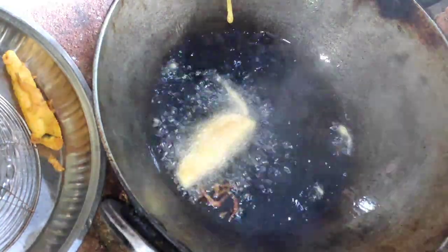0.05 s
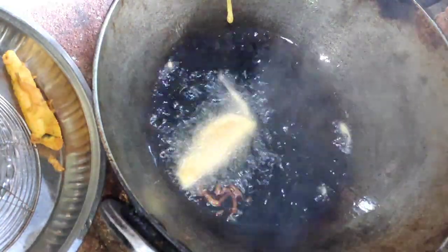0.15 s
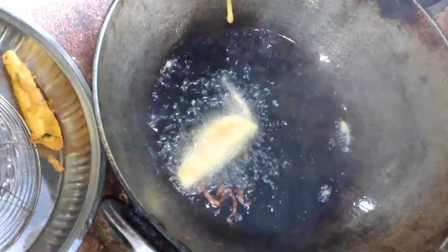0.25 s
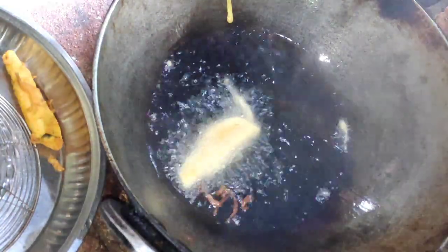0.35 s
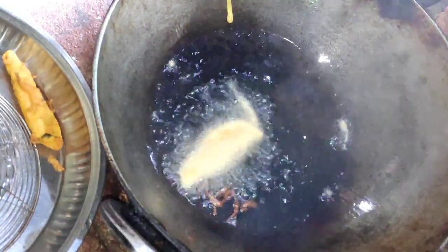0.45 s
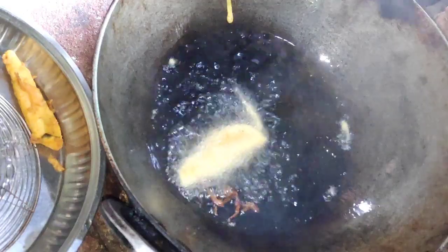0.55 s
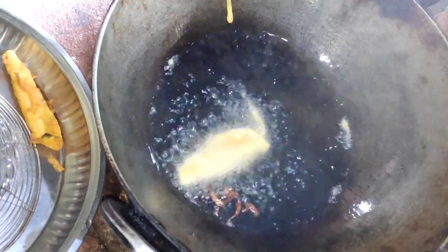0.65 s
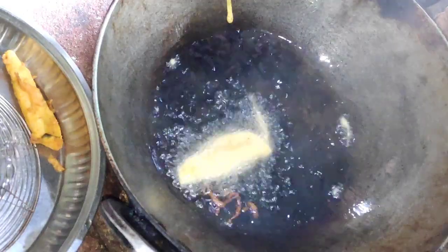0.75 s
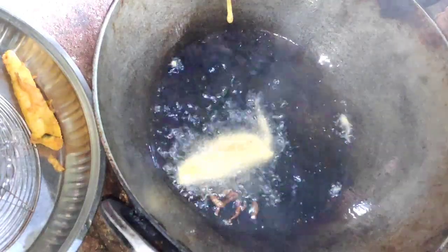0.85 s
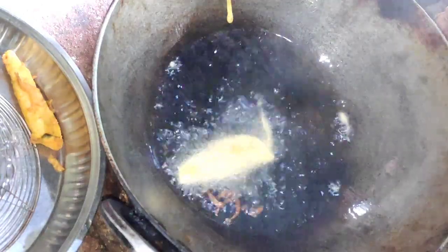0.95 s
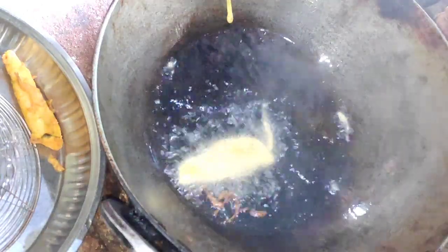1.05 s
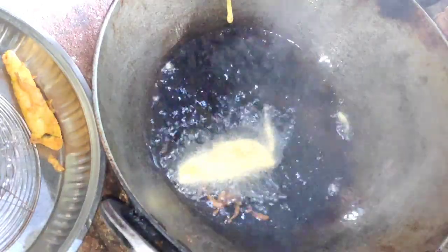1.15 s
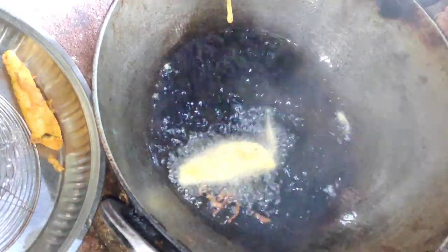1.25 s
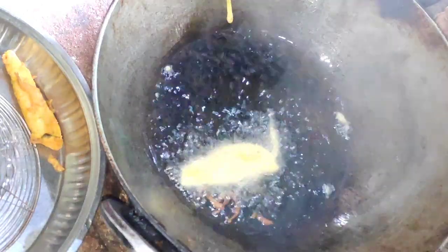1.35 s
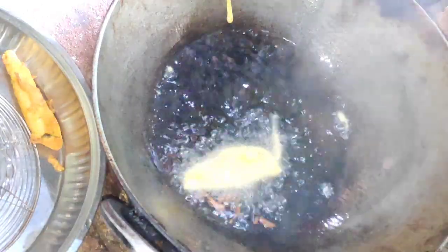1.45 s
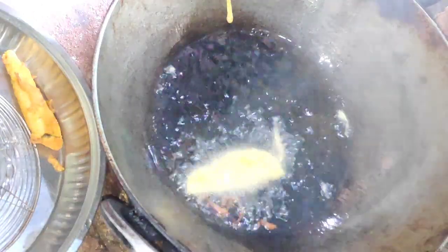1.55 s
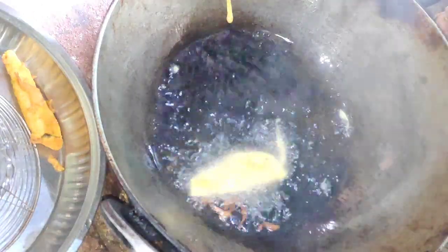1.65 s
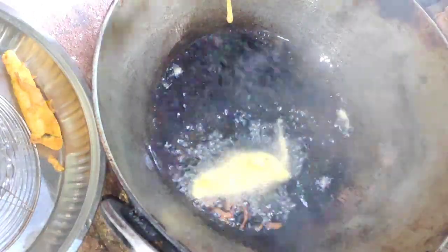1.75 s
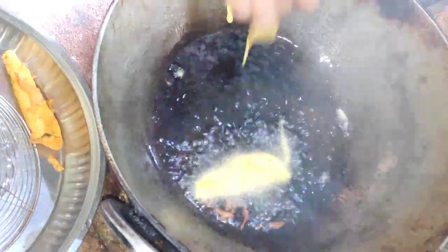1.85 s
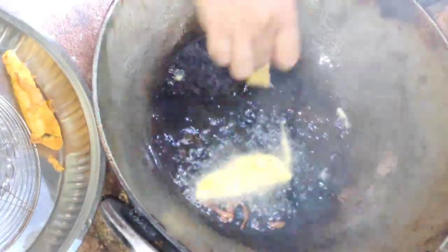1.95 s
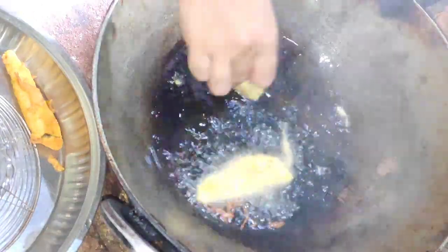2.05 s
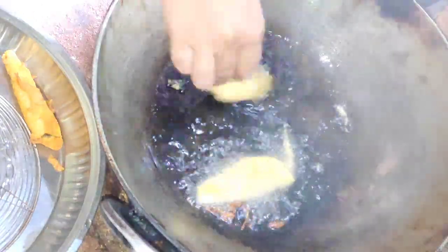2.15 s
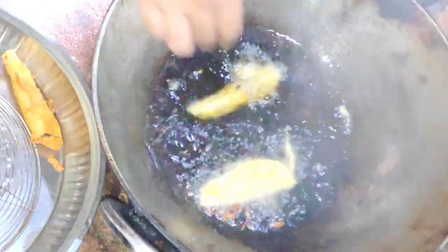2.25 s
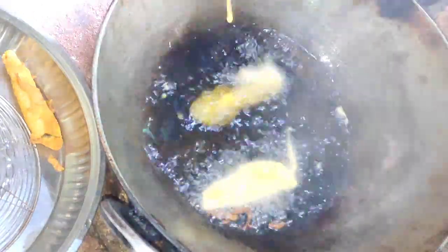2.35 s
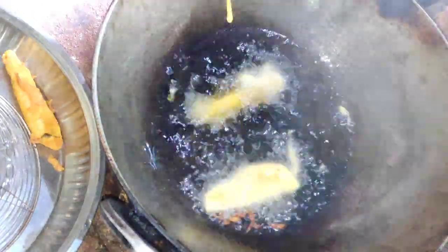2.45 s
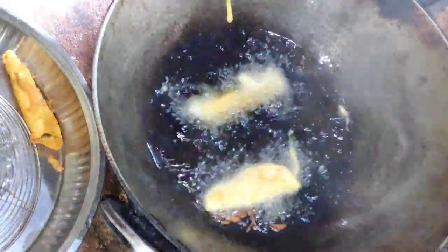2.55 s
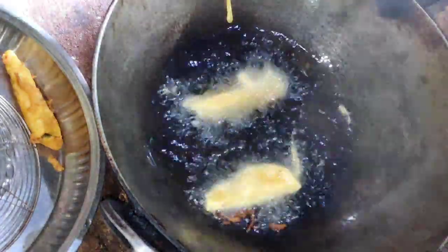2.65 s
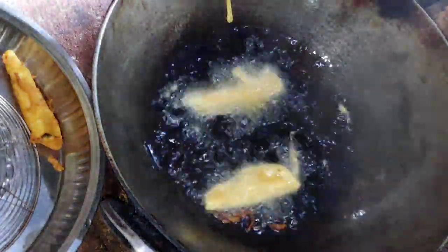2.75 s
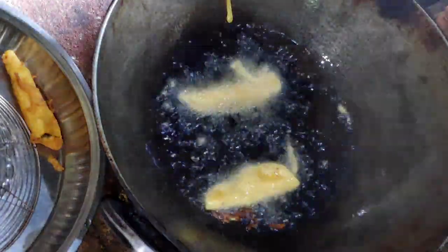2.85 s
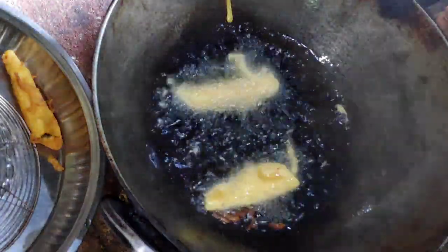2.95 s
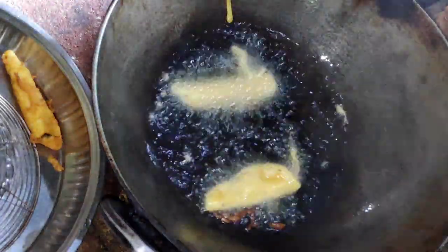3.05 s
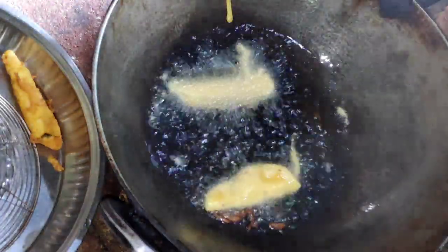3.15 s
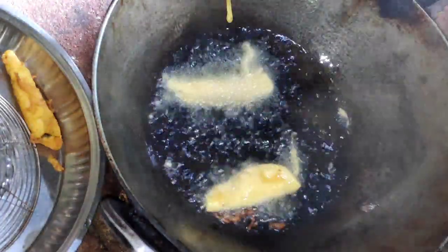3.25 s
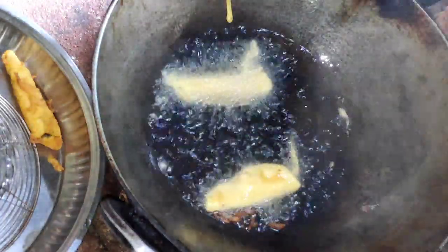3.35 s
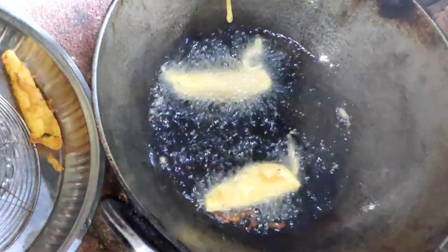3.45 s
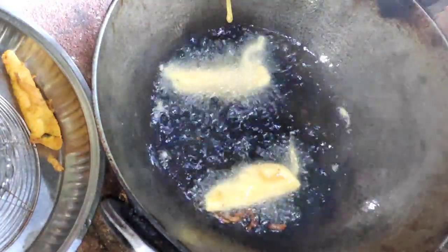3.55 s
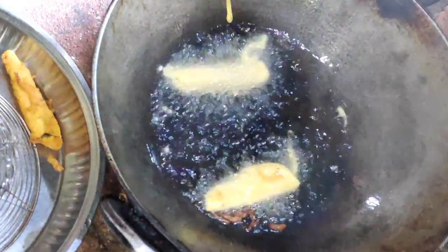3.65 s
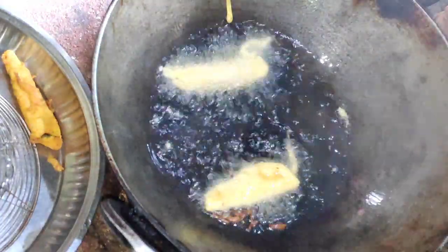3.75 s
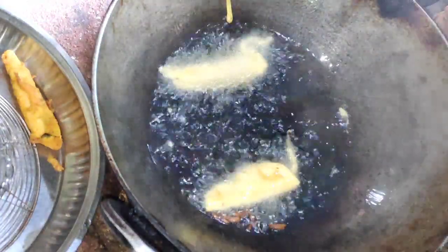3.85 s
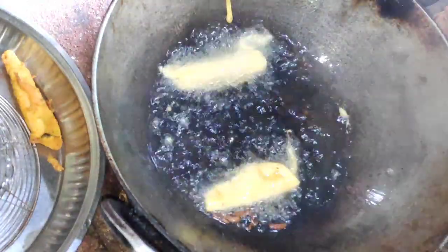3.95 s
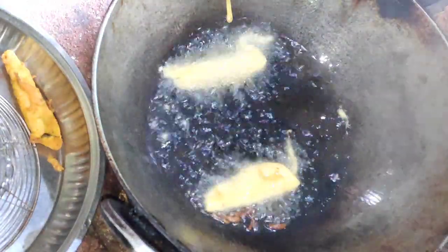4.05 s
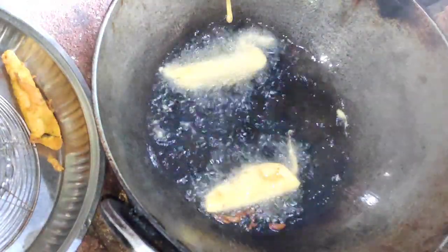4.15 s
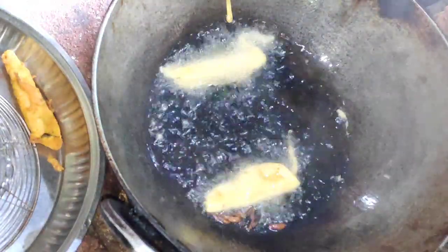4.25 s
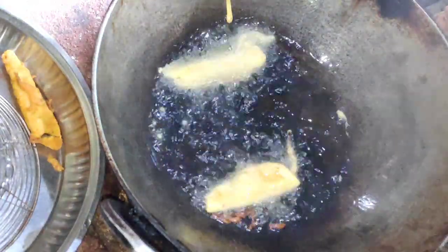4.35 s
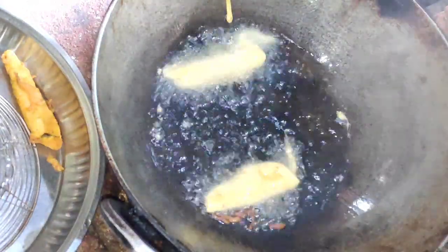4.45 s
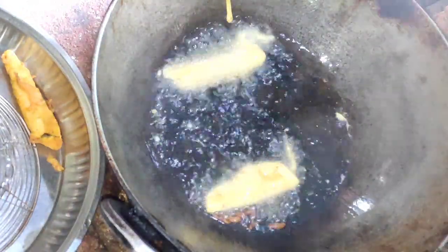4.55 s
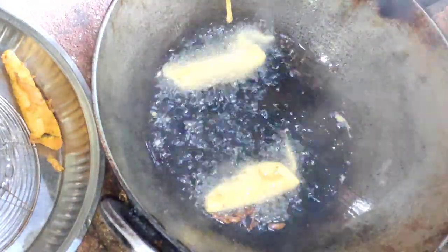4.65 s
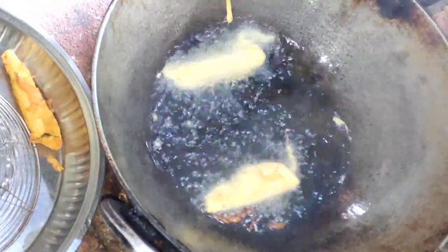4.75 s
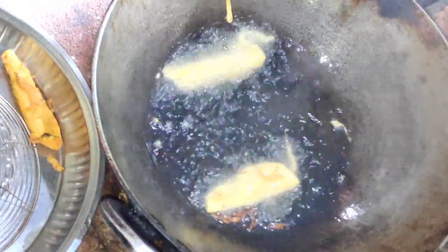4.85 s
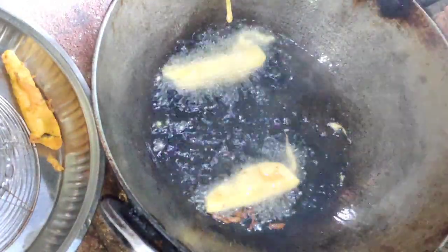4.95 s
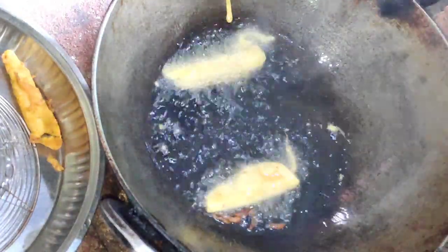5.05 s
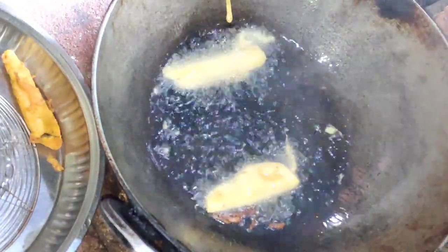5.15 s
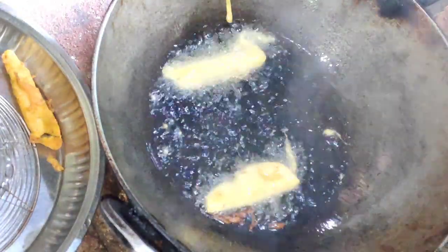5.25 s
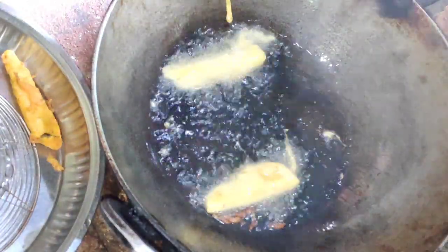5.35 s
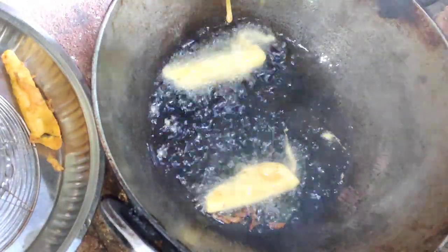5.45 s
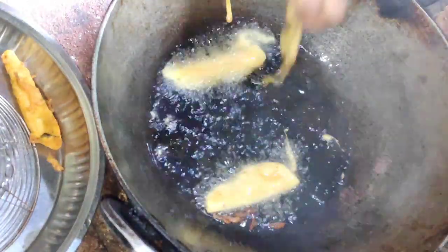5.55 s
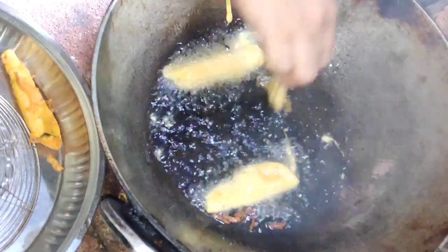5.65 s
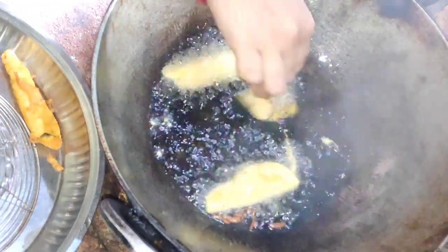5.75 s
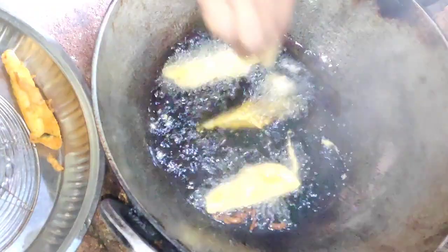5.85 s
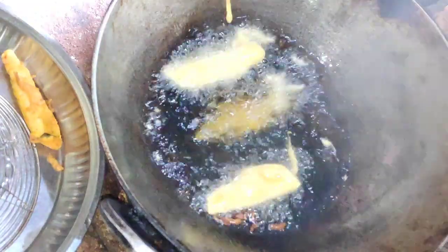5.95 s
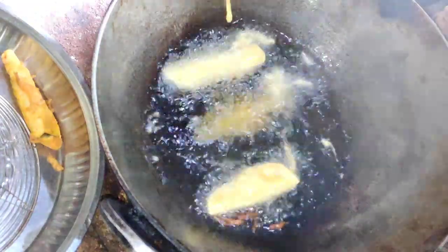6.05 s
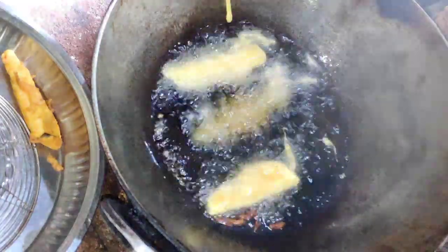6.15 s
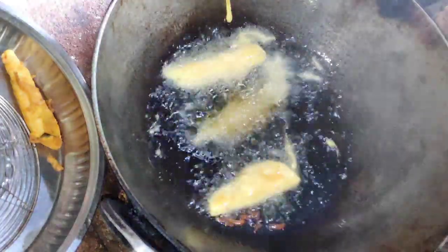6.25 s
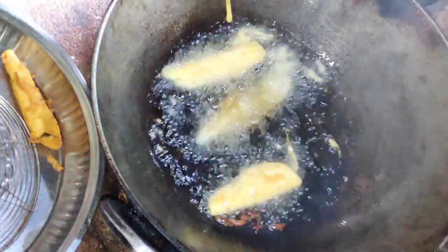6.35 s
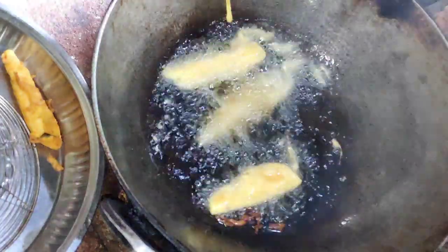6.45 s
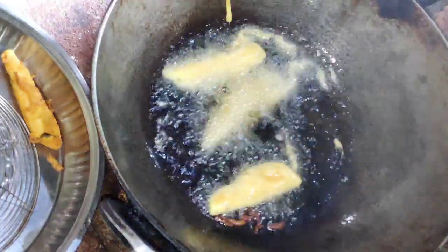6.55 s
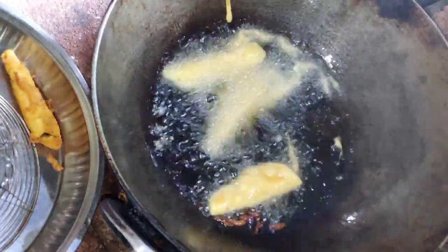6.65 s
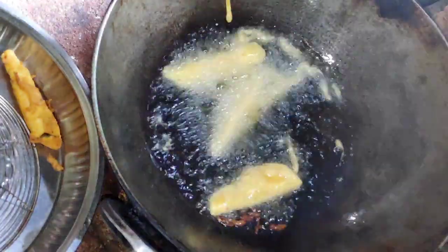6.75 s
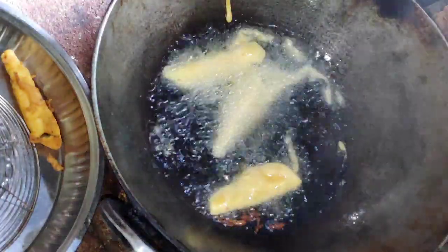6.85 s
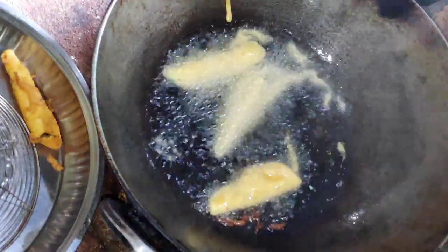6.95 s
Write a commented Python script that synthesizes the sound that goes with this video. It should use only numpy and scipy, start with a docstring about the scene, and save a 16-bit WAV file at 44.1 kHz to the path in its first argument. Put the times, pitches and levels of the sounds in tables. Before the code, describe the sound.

Deep frying in a wok of oil, heard close in stereo in a small kitchen, with brighter treble on the left. At 0 s a bright, airy sizzle lies over duller, patchy froth, with tiny droplet ticks and faint rings; it calms over two seconds. A tight, loud cluster of spits cracks at 0.7 s, with smaller ones until 2 s and faint deep rumbling from 0.5 to 2 s. Around 2.1 to 2.4 s a piece enters: the frying flares with crisp pops and dull gulps, then slowly eases. Isolated snaps come at 3.75, 3.9 and 4.5 s. From 5.1 to 5.75 s spits thicken into a rapid, sharp crackling flurry. Another piece enters near 5.7 to 5.9 s, and the sizzle and froth swell fuller and brighter, staying strong to 7 s with a few pops, notably at 6.3 s. A quiet burner rumbles throughout.

```python
"""A bright sizzle over a duller froth, with spits and pops: battered pieces deep-fry in a wok of
hot oil in a small kitchen, and two more are slipped in. Sizzle and froth are noise under
the envelopes of countless bursting steam bubbles; larger bubbles are clicks and noise bursts that ring.
Faint rings follow the froth; low noise makes the burner and, from about 0.5 to 2 s, a deeper layer.
Two microphone ports hear it, the left one brighter."""
import sys
import numpy as np
from scipy import signal
from scipy.fft import rfft, irfft
from scipy.io import wavfile

SR = 44100
rng = np.random.default_rng(int(sys.argv[2]) if len(sys.argv) > 2 else 0)


def to_wav(sig):
    """Store sig (one row per channel, or 1-D mono) as 16-bit WAV at the path in sys.argv[1].

    Samples outside -1..1 are clipped; the rate is SR.
    """
    pcm = np.clip(np.atleast_2d(sig), -1, 1) * 32767
    pcm = np.round(pcm).astype(np.int16)
    wavfile.write(sys.argv[1], SR, pcm.T)  # frames by channels


N = 308700

CUTOFF_HZ = 14300   # top of the hearing range of the ports
HZ = np.maximum(np.arange(N // 2 + 1) * SR / N, 1)   # FFT bins


def from_db(db):
    """Gain of a level in dB."""
    return 10 ** (np.asarray(db) / 20)


def rms_one(x):
    """Scale to rms 1."""
    return x / np.sqrt(np.mean(x ** 2) + 1e-20)


def peak_one(x):
    """Scale to peak 1."""
    return x / np.abs(x).max()


def at_hz(points):
    """Read a table over log frequency at every FFT bin."""
    hz, value = np.transpose(points)
    return np.interp(np.log(HZ), np.log(hz), value)


def drift(rate_hz):
    """Slow chance of spread 1: noise at every 20th sample, twice through a one-pole low-pass."""
    r = np.exp(-40 * np.pi * rate_hz / SR)
    noise = rng.standard_normal(N // 20 + 3002)
    slow = signal.lfilter([1], [1, -2 * r, r * r], noise)[3000:]   # skip the filter's run-in
    return np.interp(np.arange(N) / 20, np.arange(len(slow)), rms_one(slow))


def bursts(per_s, spread_db, burst_ms, clump_db, bed):
    """Envelope of bubbles bursting at random, in clumps, a few much larger, over a steady bed."""
    born = rng.random(N) < per_s * from_db(clump_db * drift(25)) / SR
    power = born * from_db(2 * spread_db * np.minimum(rng.exponential(1, N), 5))
    r = np.exp(-1000 / (burst_ms * SR))
    power = signal.lfilter([1], [1, -r], power)
    return np.sqrt(bed + power / power.mean())


def stereo_noise(envelope, spectrum):
    """Noise under an envelope, coloured, alike on both sides in the bass and unrelated in the treble."""
    # How alike the two ports hear a noise. Each row: frequency in Hz, left-right likeness from 0 to 1.
    likeness = [(60, 1), (125, 0.96), (250, 0.89), (1000, 0.71), (2000, 0.61), (4000, 0.02), (8000, 0.091),
                (14000, 0.037)]
    mid, side = rfft(envelope * rng.standard_normal((2, N)))
    alike = at_hz(likeness)
    pair = np.sqrt(1 + alike) * mid + np.sqrt(1 - alike) * side * [[1], [-1]]
    return rms_one(irfft(pair * from_db(at_hz(spectrum)), N))


def patchy(x, depth_db, rate_hz):
    """Third-octave bands above 700 Hz, and all below as one, swell and thin out each on its own."""
    band = np.floor(3 * np.log2(np.maximum(HZ / 700, .9)))
    spectrum = rfft(x)
    total = 0
    for k in np.unique(band[HZ < CUTOFF_HZ]):
        total = total + from_db(depth_db * drift(rate_hz)) * irfft(spectrum * (band == k), N)
    return rms_one(total)


def resonate(x, hz, width_hz):
    """Two-pole resonance with gain 1 on top."""
    r = np.exp(-np.pi * width_hz / SR)
    top = np.array([1, 0, -1]) * (1 - r * r) / 2
    return signal.lfilter(top, [1, -2 * r * np.cos(2 * np.pi * hz / SR), r * r], x)


def twice(x, hz, width_hz):
    """The same resonance applied twice: steep skirts."""
    return resonate(resonate(x, hz, width_hz), hz, width_hz)


def low_noise():
    """Low noise around 70 and 137 Hz at levels set point by point, from about 0.5 to 2 s."""
    # Levels of the low noise.
    # Each row: time in seconds, level in dB around 70 Hz, level in dB around 137 Hz.
    low_levels = [(0.499, -74.5, -71), (0.547, -72, -86), (0.658, -70, -60), (0.758, -71, -92),
                  (0.78, -80, -66), (0.815, -59.5, -72), (1.034, -75, -67), (1.078, -75, -94),
                  (1.13, -63.5, -71), (1.444, -60, -72), (1.564, -72.5, -95), (1.676, -55.5, -58),
                  (1.802, -82, -79), (1.88, -64.5, -86), (1.906, -81, -85), (1.958, -54, -68),
                  (2.028, -81, -82), (2.051, -56.5, -86)]
    s, deep_db, upper_db = np.transpose(low_levels)
    t, noise = np.arange(N) / SR, rng.standard_normal((2, N))
    deep = rms_one(twice(noise[0], 70, 73))
    upper = rms_one(twice(noise[1], 137, 78))
    deep_gain = from_db(np.interp(t, s, deep_db, left=-120, right=-120))
    upper_gain = from_db(np.interp(t, s, upper_db, left=-120, right=-120))
    return deep_gain * deep + upper_gain * upper


def burner():
    """The burner rumbles below the wok: mostly low noise whose level wanders slowly."""
    # Colour of the burner. Each row: frequency in Hz, relative level in dB per Hz.
    burner_spectrum = [(4, -22), (11, 14), (17, 8.5), (22, -17), (33, -7), (41, 2.5), (46, 0.5), (52, -3.5),
                       (80, -4.5), (140, -14.5), (220, -22.5), (470, -19), (600, -20.5), (790, -26),
                       (1200, -46), (1600, -31.5), (2500, -27)]
    level_db = -53.5
    return from_db(level_db) * stereo_noise(from_db(1.7 * drift(3.5)), burner_spectrum)


def gulps():
    """A big bubble closes under the oil: a short noisy ring, low in pitch."""
    # Dull gulps in the oil.
    # Each row: start in seconds, peak level in dB, pitch in Hz, 60 dB decay of the push in seconds.
    gulp_rows = [(0.108, -48, 490, 0.052), (.108, -48, 840, 0.02), (.9, -50.5, 1440, 0.23),
                 (1.262, -50.5, 147, 0.087), (1.515, -56, 600, .05), (1.665, -56, 180, .15),
                 (1.949, -51, 93, 0.05), (2.105, -54, 1070, .08), (2.28, -49.5, 616, .4),
                 (2.685, -53, 480, 0.089), (2.79, -44.5, 119, 0.15), (2.797, -51.5, 220, 0.051)]
    swell_cycles, sharpness = 1.7, 2.1   # time constant of the onset; pitch over bandwidth
    out, t = np.zeros(N + 8000), np.arange(8000) / SR
    noises = rng.standard_normal((len(gulp_rows), 8000))
    for (s, db, hz, t60_s), noise in zip(gulp_rows, noises):
        push = noise * (1 - np.exp(-t * hz / swell_cycles)) * from_db(-60 * t / t60_s)
        i = round(s * SR)
        out[i:i + 8000] += from_db(db) * peak_one(twice(push, hz, hz / sharpness))
    return out[:N]


def boil():
    """Gains of sizzle, fine top and froth: every bit of batter flares, swells and calms; powers add."""
    # Batter starts to boil, as whole pieces, first touches, far ends and drips.
    # Each row: start in seconds, full-boil level in dB of the sizzle, of its fine top and of the froth,
    # swell time in seconds, calming time in seconds.
    batter = [(-0.24, -31.5, -23.5, -39, .63, 0.54), (1.3, -48, -60, -50, 0.77, 1),
              (2.07, -39, -52, -47, 0.027, 0.088), (2.11, -43, -48, -39.5, 0.64, 0.88),
              (2.338, -27.5, -23.5, -36, 0.54, 0.76), (2.64, -31.5, -27.5, -48, 0.18, 1.6),
              (5.11, -37, -42, -41.5, 0.033, 0.17), (5.67, -29, -50, -34.5, 0.71, 0.21),
              (5.79, -44, -48, -37.5, .15, 0.42), (5.86, -40, -41, -37.5, 0.035, 0.099),
              (5.91, -25.5, -23.5, -34.5, 1, 3.6)]
    # How far sizzle, fine top and froth calm down as the crust dries, each in dB.
    simmer_db = (-24, -19.5, -18)
    flare_s, swell_db = 0.011, 11   # each flares up at once, short of its full boil by this much
    power = np.zeros((3, N))
    for s, *full_db, swell_s, calming_s in batter:
        age = np.maximum(np.arange(N) / SR - s, 0)
        calm = 1 - np.exp(-age / calming_s)
        swell = -swell_db * np.exp(-age / swell_s)
        db = np.outer(simmer_db, calm) + swell + np.reshape(full_db, (-1, 1))
        power += (from_db(db) * (1 - np.exp(-age / flare_s))) ** 2
    return np.sqrt(power)


def froth():
    """Slower bursts of steam bubbles: noise with a dull colour and patchy bands."""
    # Colour of the froth. Each row: frequency in Hz, relative level in dB per Hz.
    froth_spectrum = [(150, -46), (250, -16), (355, -24.5), (388, -12.5), (474, -13.5), (592, -5),
                      (772, -16.5), (1140, -7.5), (1260, -10), (1770, -11), (1900, -9), (2510, -5.5),
                      (5000, -0.5), (6500, -13.5), (11000, -120)]
    envelope = bursts(per_s=190, spread_db=1.0, burst_ms=11.6, clump_db=1.5, bed=0.9)
    return patchy(stereo_noise(envelope, froth_spectrum), depth_db=1.5, rate_hz=10.2)


def faint_rings():
    """Brief faint rings at scattered pitches around 3500 Hz follow the froth, each a little to one side."""
    per_s, sharpness, level_db = 700, 34, -14   # sharpness is pitch over bandwidth; level is over the froth
    common_hz, fall_db = 3500, 23   # strongest pitch; how much weaker one octave off
    size = from_db(1.3 * np.minimum(rng.exponential(1, N), 4)) * (rng.random(N) < per_s / SR)
    dealt = rng.integers(0, 18, N)   # which of 18 pitches each ring takes
    sides = size * rng.normal(1.0, .6, (2, N)) + 1e-18   # the trace keeps the filters fast
    rings = 0
    for k, octave in enumerate(np.linspace(-1, .8, 18)):
        hz = common_hz * 2 ** octave
        rings = rings + from_db(-fall_db * octave ** 2) * resonate(sides * (dealt == k), hz, hz / sharpness)
    band = signal.butter(2, [1500, 7000], "band", fs=SR, output="sos")
    return from_db(level_db) * rms_one(signal.sosfilt(band, rings))


def fine_top(shared):
    """The sizzle's fine top: treble noise that follows its bursts and many quicker ones."""
    # Colour of the fine top. Each row: frequency in Hz, relative level in dB per Hz.
    fine_spectrum = [(5000, -28.5), (7000, -6), (9000, -5), (11500, -1.5), (13000, 1), (14500, -3)]
    quick = bursts(per_s=4000, spread_db=1.5, burst_ms=.15, clump_db=2.0, bed=3.0)
    return stereo_noise(shared ** .7 * quick, fine_spectrum)


def sizzle(shared):
    """Countless steam bubbles burst: bright noise under their envelope, in patchy bands."""
    # Colour of the sizzle. Each row: frequency in Hz, relative level in dB per Hz.
    sizzle_spectrum = [(880, -37), (1500, -16), (4790, -3), (6190, 4), (9000, 0.5), (11700, -2),
                       (19800, -120)]
    return patchy(stereo_noise(shared, sizzle_spectrum), depth_db=1.16, rate_hz=23.0)


def ticks():
    """Lone droplets crack at random: single clicks, a few much larger, without bass."""
    per_s, spread_db, gain_db = 42, 3.5, 5
    size = from_db(spread_db * np.minimum(rng.exponential(1, N), 3)) * rng.choice([-1, 1], N)
    sides = from_db(2.4 * rng.standard_normal((2, N)))
    clicks = size * (rng.random(N) < per_s / SR) * sides
    high = signal.butter(1, 2500, "high", fs=SR, output="sos")
    return from_db(gain_db) * signal.sosfilt(high, clicks)


def pops():
    """A click and a burst ring at the bubble's pitch, with a snap, a thud, a fading fizz and the wok's hum."""
    # Spitting bubbles, and at 2.079 s a splash as batter drops in. Each row: start in seconds, peak level of
    # the ring in dB, ring pitch in Hz, snap in dB over the ring, thud in dB over the ring, pan as left over
    # right in dB, decay time of the burst in ms, fizz in dB over the ring's peak.
    pop_rows = [(0.0155, -25, 8000, -4, -30, -8, .5, -30), (0.0205, -27, 8200, 0, -30, 0, 0.54, -30),
                (0.7007, -15, 5300, -5, -37, 5, 1.0, -22), (0.701, -17, 10700, -6, -38, 6, 1.2, -27),
                (0.7025, -10.5, 5160, -12, -43, -2, 1.1, -18), (0.7025, -25.5, 3000, -14, -37, 0, 1.6, -28),
                (0.7039, -12, 5760, -7, -39, -4, .6, -25), (0.705, -24, 5300, -10, -39, -2, .6, -30),
                (0.8926, -29.5, 9030, 4, -27, -6, 1, -23), (1.036, -33, 12500, -3, -30, 0, 5, -18),
                (1.1185, -30, 11100, 3, -24, -4, .5, -23), (1.4470, -29.5, 10470, 9.5, -33, -10, 0.65, -29),
                (1.841, -28.5, 10600, 1, -29, -1, 1, -30), (1.8775, -26, 12300, -6, -32, 0, 3.2, -26),
                (1.898, -32, 11000, 6, -28, -8, 1.1, -29), (1.9673, -32.5, 10900, -16, -17, 5, 1.1, -21),
                (2.079, -41, 4830, -10, -25, 1, 25, -6), (2.3235, -35, 7660, 14, -8, -6, 4, -26),
                (2.347, -22, 8750, 2, -18, -5, 1.2, -21), (2.357, -21, 11100, -11, -30, 2, 0.82, -23),
                (2.3615, -23, 10500, -15, -35, 22, 1.1, -22), (2.3707, -22, 12000, -2, -30, 6, .6, -28),
                (2.376, -27, 11000, 0, -30, 0, .6, -28), (2.45, -22, 8440, -3, -31, -9, 1.3, -32),
                (3.718, -33.5, 8970, -6, -34, 8, 10, -16), (3.7274, -33.5, 9700, 2, -39, 23, 3, -15),
                (3.7554, -23.5, 9400, 10.5, -7, -12, 0.79, -32),
                (3.8762, -15.5, 9700, -8, -27, -6, 0.95, -26), (4.5113, -30, 7000, 8, -7, 4, 1.06, -23),
                (4.5282, -30, 6540, 9.5, -19, 7, 1.7, -18.5), (4.5505, -22.5, 7500, 8.5, -28, -4, 1.4, -23),
                (4.7205, -30, 11000, 8, -20, 8, 1, -22), (4.735, -31, 7500, 6, -25, 1, 3, -20),
                (5.0755, -45.5, 5600, 21.5, 2, 9, 6.2, -20), (5.128, -41, 2500, 0, 1, 0, 0.68, -29),
                (5.1318, -27, 3830, -1, -11.5, -3, 1.8, -29), (5.142, -39, 4000, 2, -9, -1.5, 0.91, -30.5),
                (5.165, -34, 11000, 5, -1, -2, 0.42, -28), (5.2105, -26, 13300, -15, -25, 0, 1.5, -28),
                (5.2145, -39, 3700, 1, -2, 3, .5, -28), (5.2294, -26.5, 4150, 14, 1.5, 5, 0.64, -26),
                (5.248, -23.5, 5600, 17, 2.5, 7, 1.15, -23), (5.2588, -21, 12000, 9, -16, -2, .8, -26),
                (5.276, -18, 7900, -3, -30, 0, .8, -22), (5.291, -26.5, 3300, 11, -6, -7, .8, -40),
                (5.304, -33, 10900, 10, -24, 0, .8, -26), (5.3186, -17, 5200, 8, -17, -8, 1.1, -19.5),
                (5.3253, -16, 7650, -6, -39, -7, 0.6, -26), (5.3546, -21, 2830, 10, -7, 0, 2.2, -19.5),
                (5.3565, -23, 5800, 4, -25, 0, 1.6, -19), (5.383, -26, 7660, 4, -24, 3, 2.9, -19),
                (5.3947, -30, 6140, -4, -28, -20, 2.3, -18), (5.4005, -17.5, 5700, -2, -21, -5, 2.7, -22),
                (5.4077, -21.5, 4770, 9, -22, -6, 2.3, -21), (5.4, -28, 3400, -10, -28, 0, 9.3, -12.5),
                (5.426, -23, 5560, -1, -30, 2, 2.2, -22), (5.4457, -11.5, 6650, -19, -23, -5, 0.58, -23),
                (5.455, -16.5, 3360, 2, -23, 0, 1.6, -30), (5.4555, -20, 5800, 3, -30, 0, 1.7, -28),
                (5.4590, -19.5, 6200, 12.5, -21, -6, 2.3, -24),
                (5.4750, -28.5, 3300, -18, -18, -1, 7.9, -13.5),
                (5.4948, -17.5, 6600, 0, -27, -9, 2.3, -19.5), (5.4958, -21.5, 10900, 9, -19, 2, 0.88, -28),
                (5.4958, -31, 3600, -10, -23, 5, 3, -17), (5.5405, -22.5, 6300, -13, -36, -1, 2.5, -30),
                (5.5755, -28, 11500, -10, -25, 5, .7, -30), (5.6015, -27, 11000, -0.5, -21, -3, .8, -30),
                (5.6055, -26, 11000, -8, -34, -4, 0.87, -28), (5.6160, -18.5, 12200, -4, -36, 1, 0.71, -23),
                (5.6489, -24, 3320, 13, -3.5, -5, 1.7, -22), (5.663, -18, 7660, 9.5, -29, -3, 1.1, -29),
                (5.7454, -33.5, 7200, -3, -37, -22, 2.4, -30), (6.059, -29, 8000, 4, -30, 0, .7, -28),
                (6.1285, -22, 6250, 3, -16, -1, 1, -16), (6.2800, -15.5, 5460, -6, -29, -6, .9, -17),
                (6.3388, -27.5, 5600, -23, -57, -25, 1.9, -20),
                (6.775, -25.5, 6960, -6, -50, -14, 1.5, -25)]
    # Resonances of the wok. Each row: frequency in Hz, width in Hz, relative level in dB.
    wok_modes = [(2300, 53, -7), (3040, 41, 8.5), (3430, 75, 2), (4950, 160, 7.5)]
    ring_sharpness, fizz_sharpness = 3.5, 4.4   # pitch over bandwidth, each resonance applied twice
    alike, click_size = 0.53, 3.9   # share of noise common to both sides; click of a 1 ms burst
    snap_share = 0.45   # the snap decays in this share of the burst's time
    fizz_t60_s, wok_t60_s, wok_under_fizz_db = 0.23, 0.11, -5.5
    out, t = np.zeros((2, N + 8000)), np.arange(8000) / SR
    high = signal.butter(2, 3600, "high", fs=SR, output="sos")
    low = signal.butter(2, [800, 3600], "band", fs=SR, output="sos")
    noise = rng.standard_normal((len(pop_rows), 3, 8000))
    for row, (both, left, right) in zip(pop_rows, noise):
        s, db, hz, snap_db, thud_db, pan_db, burst_ms, fizz_db = row
        pair = alike * both + np.sqrt(1 - alike ** 2) * np.array([left, right])
        click = t == 0
        snap_decay = np.exp(-1000 * t / (snap_share * burst_ms))
        # the film tears, then sprays
        burst = pair * np.exp(-1000 * t / burst_ms) + click_size / burst_ms * click
        pop = peak_one(twice(burst, hz, hz / ring_sharpness))
        fizz = rms_one(twice(pair, hz, hz / fizz_sharpness))
        pop += from_db(fizz_db - 60 * t / fizz_t60_s) * fizz
        pop *= from_db(np.array([[pan_db], [-pan_db]]) / 2)
        snap = pair * snap_decay + 0.5 * click
        pop += from_db(snap_db) * peak_one(signal.sosfilt(high, snap))
        thud = 0.19 * both * snap_decay + click   # alike on both sides
        pop += from_db(thud_db) * peak_one(signal.sosfilt(low, thud))
        wok = sum(from_db(mode_db) * resonate(pair[::-1], mode_hz, width_hz)
                  for mode_hz, width_hz, mode_db in wok_modes)
        pop += from_db(fizz_db + wok_under_fizz_db - 60 * t / wok_t60_s) * rms_one(wok)
        i = round(s * SR)
        out[:, i:i + 8000] += from_db(db) * pop
    return out[:, :N]


def scene():
    """Mix the frying, led by the boil, with burner, pops, gulps and low noise."""
    sizzle_gain, fine_gain, froth_gain = boil()
    surge = from_db(.7 * drift(15))   # the boil surges and slackens
    shared = bursts(per_s=1200, spread_db=1.9, burst_ms=.25, clump_db=2.0, bed=1.2)
    frying = sizzle_gain * (sizzle(shared) + ticks())
    frying += fine_gain * from_db(0.99 * drift(18)) * fine_top(shared)   # the fine top flickers
    frying += froth_gain * (froth() + faint_rings())
    return surge * frying + burner() + pops() + gulps() + low_noise()


def record(dry):
    """Each port has its own colour, the left hears the treble a little late; the top is cut."""
    # Colour of the left port against the right. Each row: frequency in Hz, left over right in dB.
    port_tilt = [(60, -2), (99, 4), (160, -5.5), (270, 0.5), (450, -1.5), (740, 0.5), (1220, -0.5),
                 (2010, 0), (3330, 0), (5500, -2.5), (9080, 0), (15000, 20.5)]
    # Timing between the ports. Each row: frequency in Hz, phase in radians by which the left leads.
    left_lead = [(0, 0), (2700, -.3), (3400, -2.2), (4500, -3.2), (6000, -2.2), (9300, -3.7), (14500, -9)]
    tilt = from_db(at_hz(port_tilt))
    right = np.sqrt(2 / (1 + tilt ** 2))   # the two ports share the power
    left = right * tilt * np.exp(1j * np.interp(HZ, *np.transpose(left_lead)))
    heard = irfft(rfft(dry) * np.array([left, right]), N)
    top_cut = signal.ellip(10, .2, 40, CUTOFF_HZ, fs=SR, output="sos")
    return signal.sosfiltfilt(top_cut, heard)


dry = scene()
out = record(dry)
to_wav(out)
```